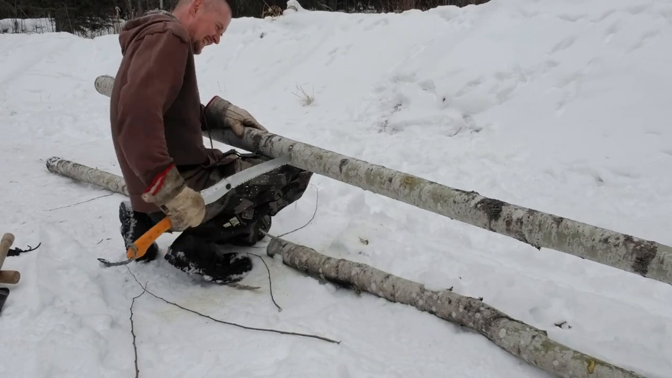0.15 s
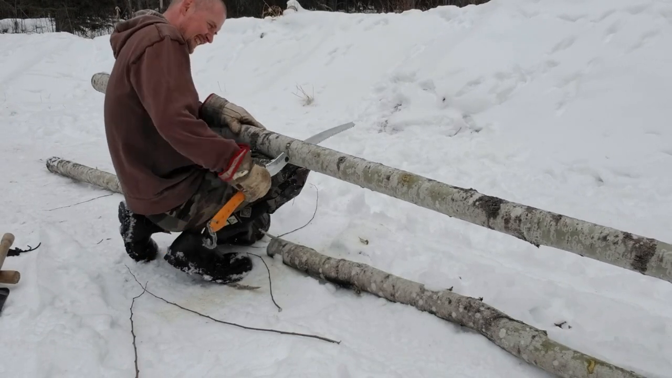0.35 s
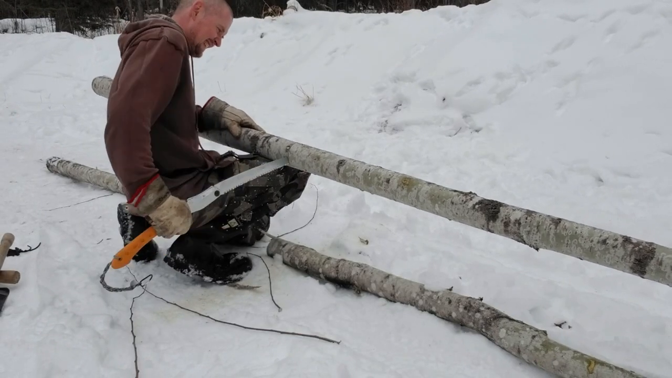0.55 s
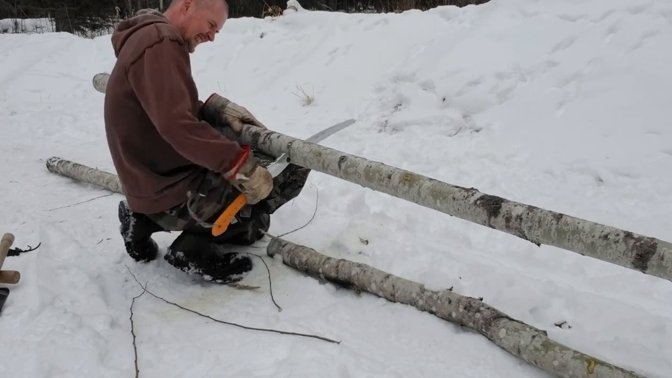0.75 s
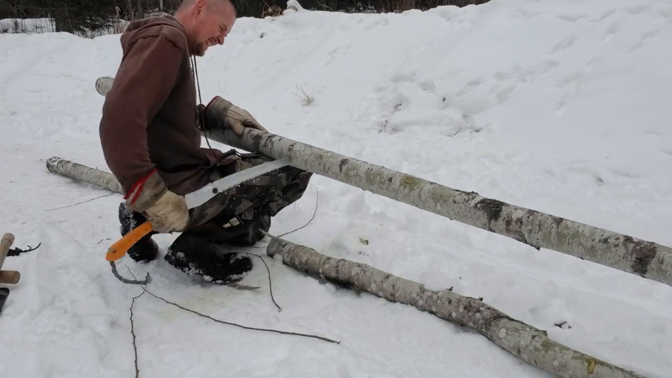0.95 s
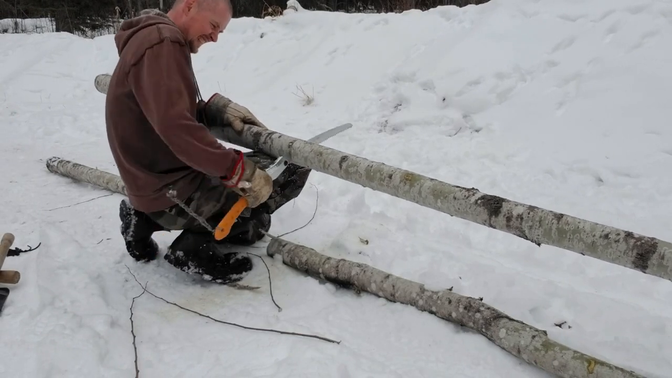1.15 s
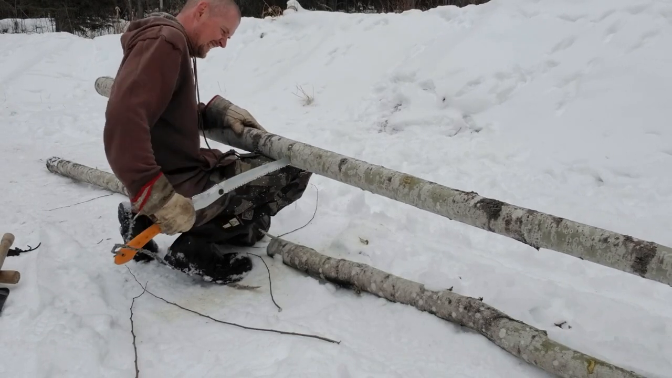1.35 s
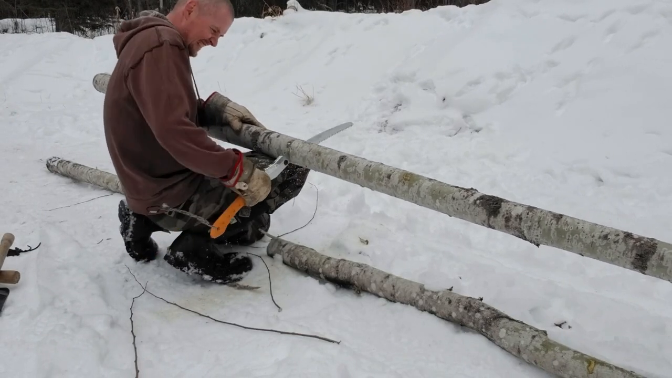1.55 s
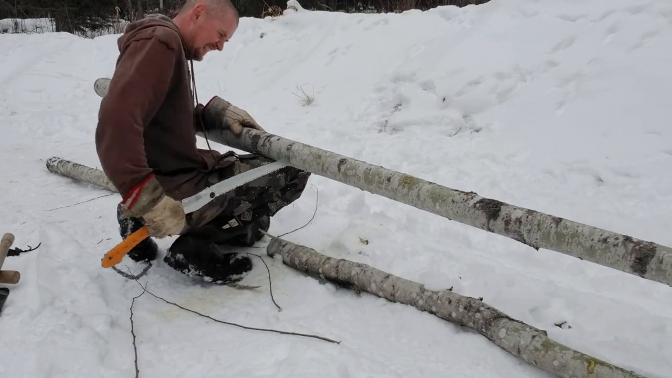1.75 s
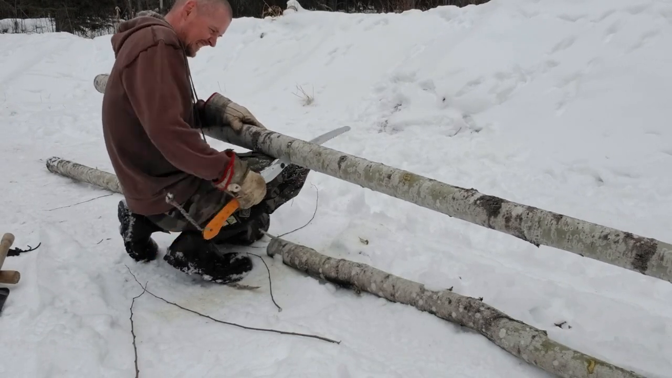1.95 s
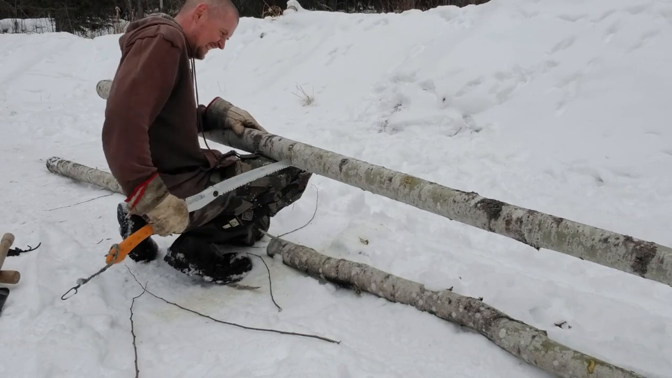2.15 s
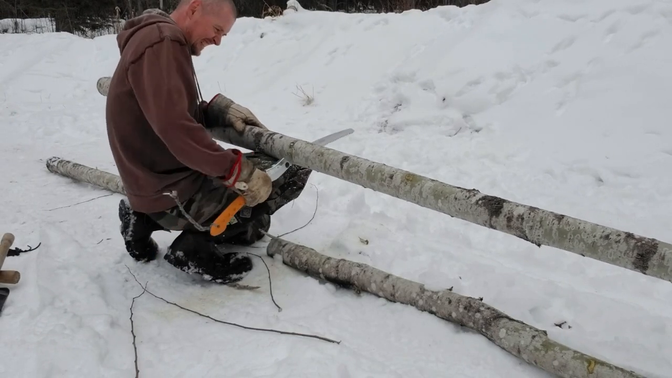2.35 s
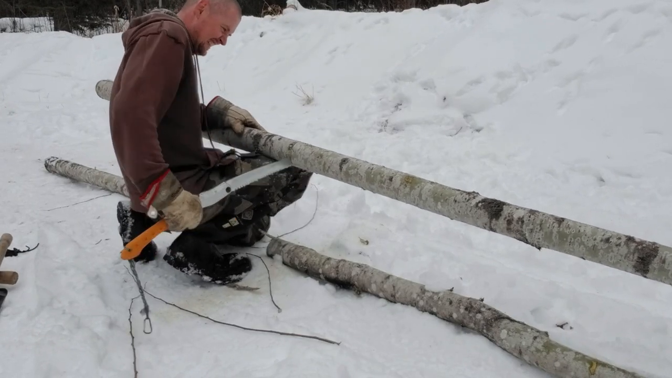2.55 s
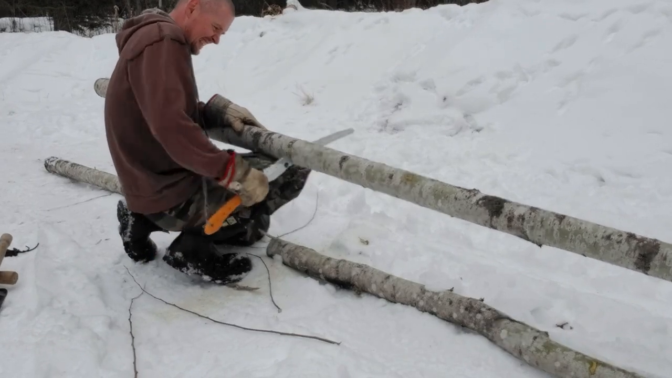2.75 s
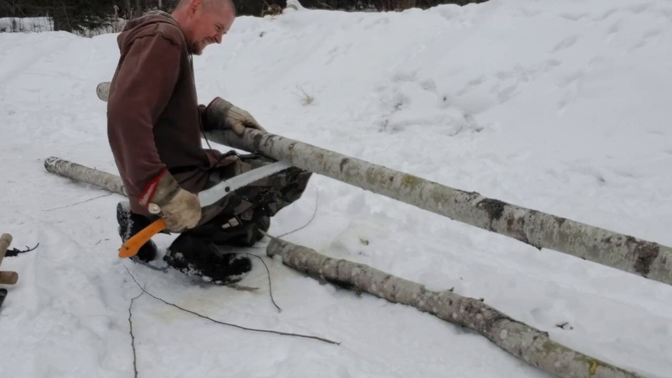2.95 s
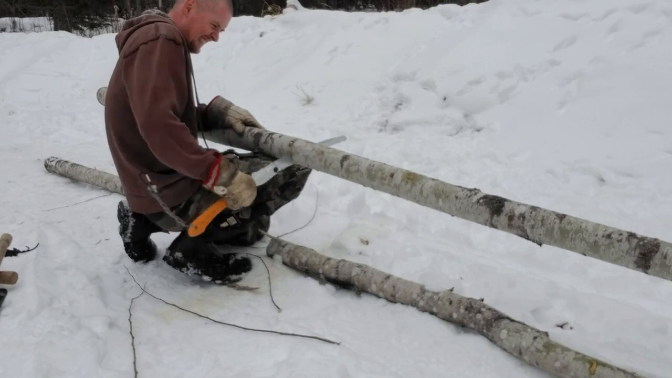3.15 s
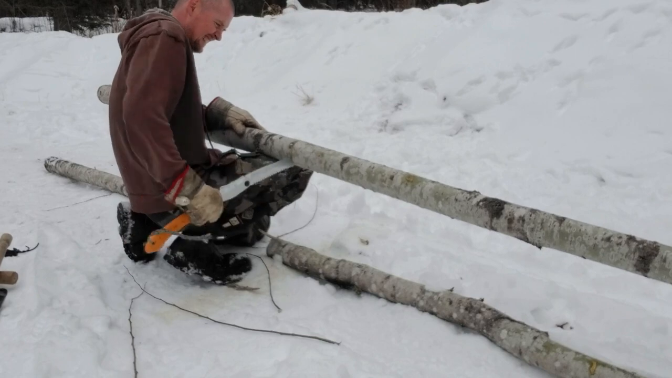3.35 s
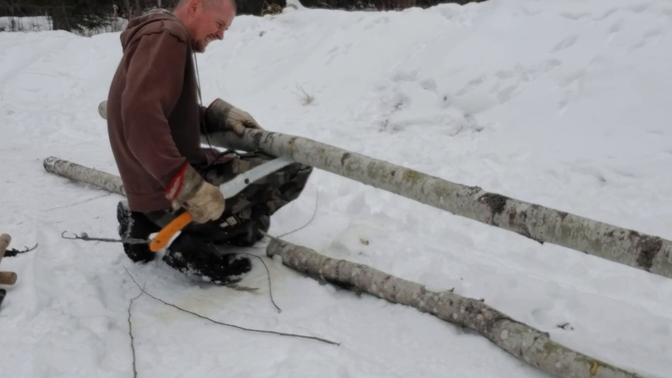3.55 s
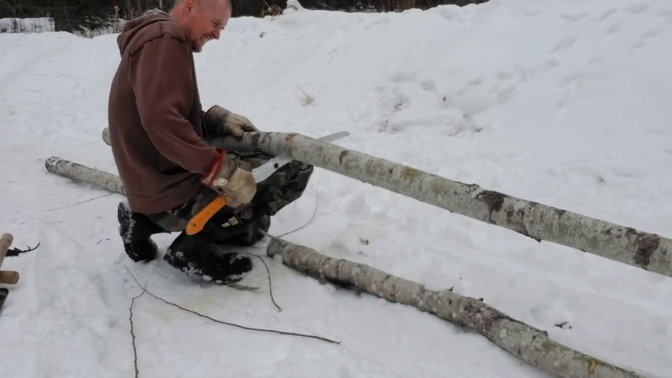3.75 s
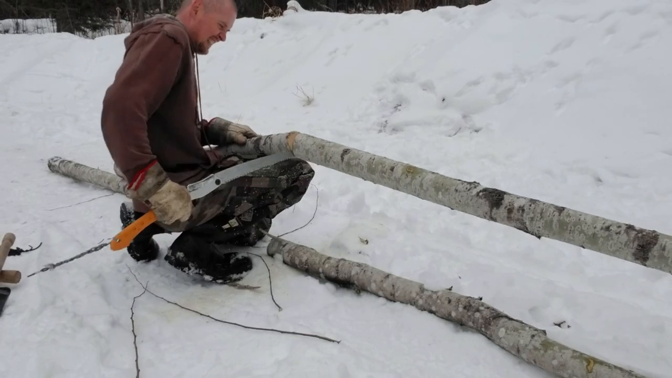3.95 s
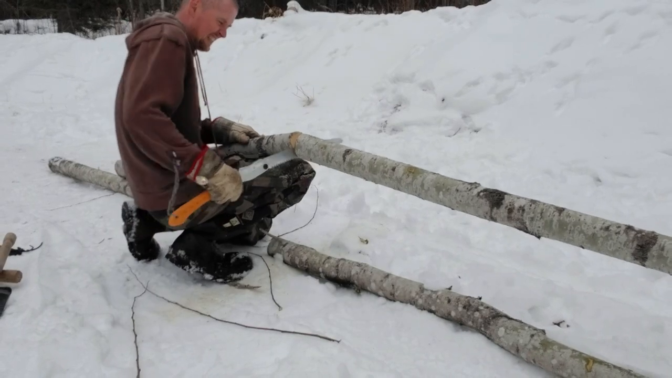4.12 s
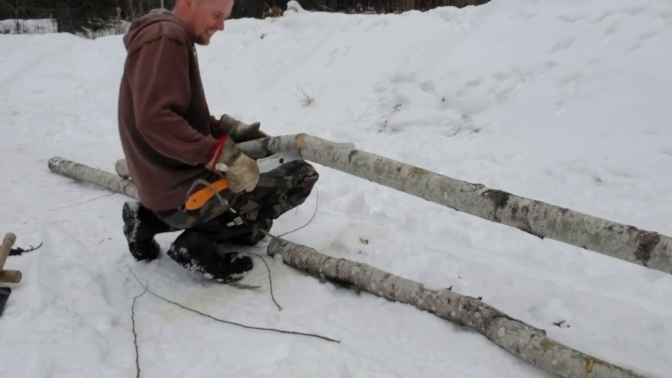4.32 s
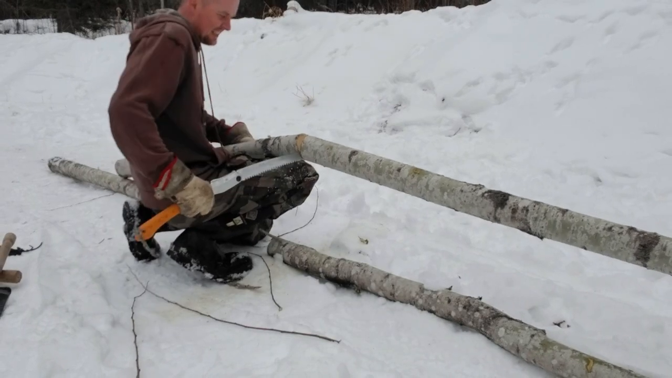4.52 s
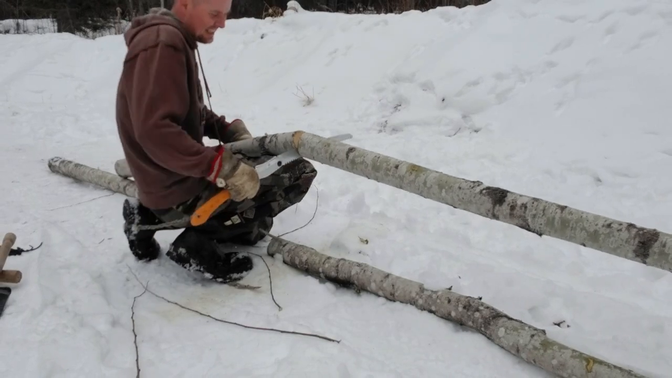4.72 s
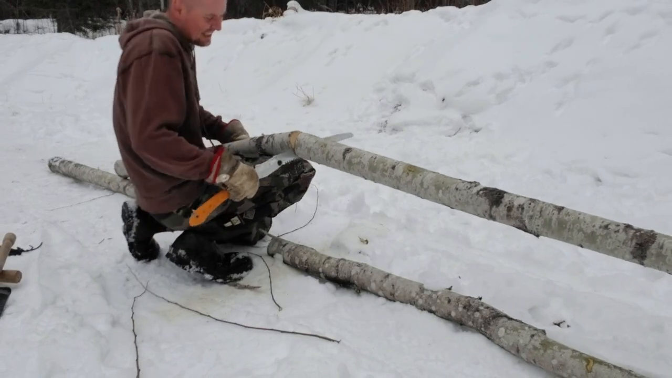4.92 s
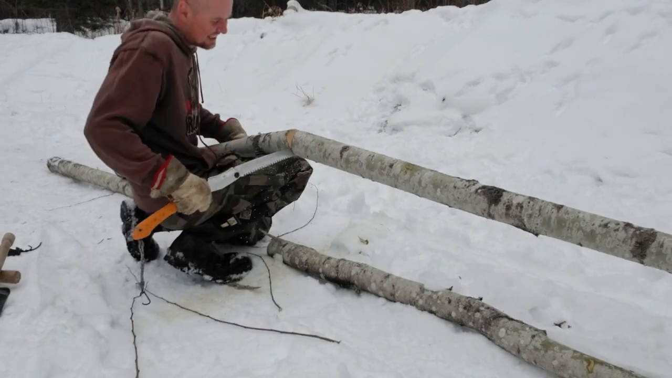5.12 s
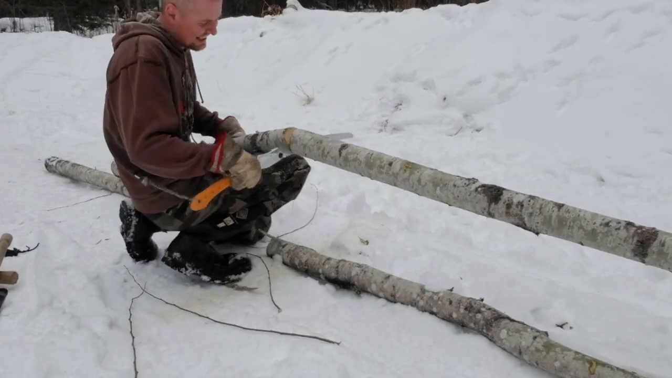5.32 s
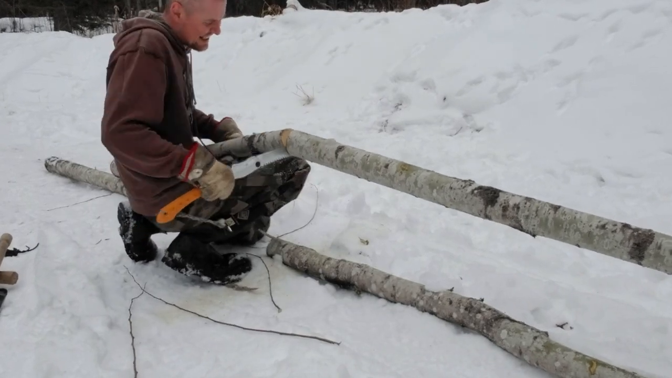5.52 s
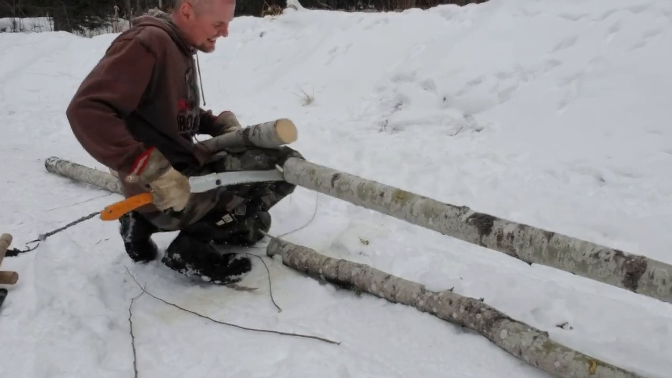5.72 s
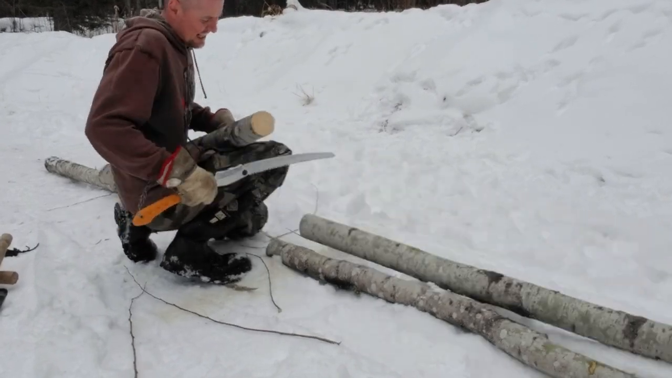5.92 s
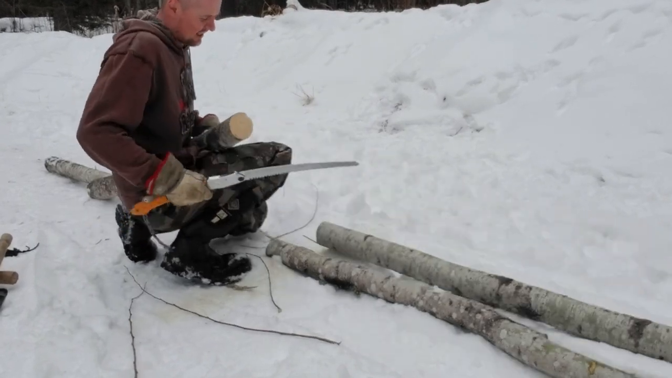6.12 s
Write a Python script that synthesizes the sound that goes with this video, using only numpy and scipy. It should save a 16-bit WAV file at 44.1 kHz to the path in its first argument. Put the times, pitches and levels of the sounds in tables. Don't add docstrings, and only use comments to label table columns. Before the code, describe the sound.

Steady toothy rasping of a hand saw in damp wood, about five strokes a second counting both directions, heard close in stereo on an open snowy slope with no echo. The blade chatters and the handle taps the wood. Later strokes are slower and weaker as the cut opens; a bright crack and solid wooden thump end it, leaving near silence.

```python
import sys
import numpy as np
from scipy import signal
from scipy.fft import rfft, irfft
from scipy.io import wavfile
from scipy.ndimage import uniform_filter1d

SR = 44100
rng = np.random.default_rng(int(sys.argv[2]) if len(sys.argv) > 2 else 0)


def unload_wav(signal):
    wavfile.write(
        sys.argv[1],
        SR,
        np.round(np.clip(np.atleast_2d(signal).T, -1, 1) * 32767).astype(np.int16),
    )


def elevation(decibels):
    levels = np.asarray(decibels, float)
    return 10 ** (levels / 20)


N = 272538

# (frequency [Hz], density [dB per Hz])
AIR_COLOUR = [(15, -27), (25, 3), (361, -12), (1180, -10), (1460, -15), (2250, -8), (3200, -22),
              (15700, -25)]
AIR_DB = -65
# (fastest moment [s], speed-up [s], slow-down [s], rasp [dB], ring at the kerf [dB])
PULLS = [(.088, .15, 0.11, -30, -43.5), (.484, .13, 0.12, -28.5, -44.5), (.912, .17, 0.1, -29, -43.5),
         (1.315, .13, 0.12, -30, -46), (1.707, .13, 0.12, -27.5, -42), (2.112, 0.14, 0.12, -28.5, -43),
         (2.525, .15, 0.13, -29.5, -43.5), (2.942, .17, 0.11, -29.5, -43), (3.385, .18, 0.11, -29, -42.5),
         (3.826, 0.19, 0.17, -30.5, -40.5), (4.43, 0.2, 0.14, -36, -39.5), (5.0, 0.28, 0.16, -35, -44),
         (5.57, .3, 0.28, -34.5, -41)]
# (fastest moment [s], speed-up [s], slow-down [s], rasp [dB], ring at the kerf [dB])
PUSHES = [(0.289, 0.13, 0.12, -33.5, -42), (0.707, 0.13, 0.14, -33, -42.5),
          (1.11, 0.13, 0.12, -33.0, -43.5), (1.511, 0.13, 0.13, -33.5, -42.5),
          (1.919, 0.14, 0.12, -34.5, -43), (2.33, 0.14, 0.11, -33.5, -44), (2.716, 0.11, 0.14, -34, -46.0),
          (3.136, 0.13, 0.16, -35, -43.5), (3.606, 0.15, 0.16, -34.3, -43.5),
          (4.103, 0.17, 0.18, -42, -43.5), (4.711, 0.2, 0.17, -41, -46), (5.276, 0.21, 0.22, -42, -44.5),
          (5.786, 0.14, 0.17, -40, -47)]
# powers of blade speed, and drift over the stroke in dB per s
RASP_POWER, KERF_POWER, POLE_POWER = (2.97, 3.34), (1.9, 2.71), (1.72, 1.65)
RASP_LEAN_DB_PER_S, KERF_LEAN_DB_PER_S, POLE_LEAN_DB_PER_S = (24, 9), (5, 31.5), (34, 21)
POLE_DB, POLE_FOLLOWS, REFERENCE_RASP_DB = (-42.5, -45), 0.32, -31.5
DRAG_DB = (-84, -82.5, -77.5)
# (time [s], held [s], level [dB], time to set in [s])
JAMS = [(0.352, 0.022, -13, .004), (.758, 0.03, -19, .004), (2.794, 0.019, -12, 0.0055),
        (3.69, 0.019, -9, 0.024), (3.95, 0.022, 2, .004), (4.209, 0.11, -13.5, .05),
        (4.417, .03, 4, 0.0036), (4.825, .052, -15.5, 0.0064), (5.369, .078, -14, 0.031),
        (5.695, 0.053, -6.5, 0.0053), (5.842, .4, -67, 0.0041)]
# (time [s], gape [0 tight to 1 open])
SAG = [(0, 0.1), (3.9, 0.14), (4.06, 0.41), (4.2, 1), (4.34, 0.95), (4.45, 0.51), (4.7, 0.47), (5., 0.31),
       (5.3, 0.5), (5.47, 0.22), (5.8, 0.14)]
PULL_GAPE = 0.14
POLE_SAG_DB = -8.5
# (first bite [s], end [s], rate at start [bites per s], rate at end [bites per s], depth [dB])
CHATTER = [(0.017, 0.1, 53, 83, 3.4), (0.427, 0.48, 69, 65, 5.0), (0.695, 0.755, 53, 75, 2.6),
           (0.825, 0.9, 59, 83, 2.3), (1.266, 1.36, 59, 91, 4.6), (2.851, 2.95, 47, 75, 4.5),
           (3.128, 3.21, 93, 117, 2.7), (3.286, 3.39, 43, 73, 6.2), (3.731, 3.82, 55, 43, 5.3),
           (3.869, 3.94, 49, 35, 2.6), (4.05, 4.13, 65, 51, 3.6), (4.399, 4.53, 35, 63, 3.2),
           (4.618, 4.8, 81, 67, 2.8), (4.901, 5.09, 45, 69, 4.8), (5.475, 5.55, 35, 67, 5.2)]
# (frequency [Hz], density [dB per Hz])
RASP_COLOUR = [(1470, -24), (2500, -13), (2870, -12.5), (4250, -13.5), (6440, -9), (7060, -10.5),
               (7800, -7), (8890, -10), (12700, -1), (15700, -2.5)]
# (frequency [Hz], width [Hz], level tight [dB], level open [dB])
KERF_MODES = [(1067, 76, -1, -7), (1320, 93, 2, -7.5), (1635, 310, 1, 1), (2139, 370, -2, 11.5),
              (2736, 520, -3, 11.5), (4800, 3000, -6, 5)]
# (frequency [Hz], width [Hz], level tight [dB], level open [dB])
POLE_MODES = [(60, 45, -3.5, 1.5), (192, 79, 3, -10.5), (403, 34, 0, -4.5), (469, 120, 1, -4),
              (700, 92, 4.5, 9.5), (863, 140, 1, 11)]
# (frequency [Hz], level [dB], t60 [s])
STRUCK_MODES = [(150, 7.5, 0.13), (229.5, 8.5, 0.088), (296, -1.5, 0.16), (371.6, 9, 0.095),
                (478, 6, 0.081), (670, 11.5, 0.059), (776, 17, 0.022), (995, 8.5, 0.078), (1335, -17, .018),
                (1610, -18, .02), (2115, -20, .06)]
# (time [s], peak [dB], centre of colour [Hz], width [octaves], ring time [factor])
KNOCKS = [(0.3506, -24.5, 412, 1.03, 0.84), (0.7596, -18.5, 332, 1.5, 0.89), (0.7937, -35.5, 200, 1.9, .65),
          (1.1836, -39, 525, 1.5, 1), (1.992, -51, 310, 1.2, 0.63), (2.397, -41.5, 310, 2.4, 0.85),
          (2.7946, -22.5, 252, 1.9, 1.13), (3.9512, -27, 150, 1, 1.36), (3.987, -40, 340, 0.56, .75),
          (4.828, -39, 270, 1, 1.1), (5.6946, -22.5, 700, 0.13, 1.3), (5.7072, -27, 700, 0.4, 0.63),
          (6.0287, -47, 410, 2.4, 0.41)]
# (time [s], level [dB], length [s], centre [Hz])
SNAPS = [ (.3525, -35, .003, 1400), (.7605, -33, .0046, 1200), (.7955, -37, .003, 9000),
         (1.2545, -39, .004, 12000), (2.2825, -35, .004, 13000), (2.4385, -46, .003, 9000),
         (2.7955, -37, .0025, 1500), (3.0805, -42, .004, 10700), (3.2705, -43, .005, 9000),
         (3.2865, -38, .012, 11000), (3.6995, -42, .003, 4000), (3.7218, -38, .003, 6000),
         (3.7905, -34, .005, 11100), (3.8732, -27, .001, 13000), (3.9622, -34, .004, 2300),
         (3.9624, -34, .002, 10000), (4.0475, -42, .006, 3000), (4.0655, -32, .005, 2200),
         (4.3385, -42, .005, 9000), (4.5725, -51, .008, 12000), (4.8285, -45, .0034, 1200),
         (4.9995, -35, .004, 13000), (5.4695, -38, .0056, 6600),
         (5.6112, -28, .0012, 13000), (5.6737, -26, .002, 12000), (5.6807, -38, .0025, 7000),
         (5.6942, -33, .0023, 5000), (5.8432, -29, .0017, 13000), (5.8457, -27, .0014, 14000),
         (5.8512, -36, .012, 7300), (5.8532, -28, .009, 1220), (5.876, -28, .06, 220),
         (5.8809, -13, .0006, 14500), (5.8882, -38, .0008, 13000), (5.8999, -16, .0007, 13000),
         (5.9002, -35, .005, 2200), (5.93, -39, .08, 150), (6.032, -46, .03, 500),
         (6.1732, -46, .002, 14000)]
SNAP_SPREAD, WIDEST_HZ = 1.16, 9000
# (frequency [Hz], level [dB], t60 [s])
DROP_MODES = [(88.8, -13, 0.86), (143.7, -2.5, 0.22), (200, -8, 0.28), (282.7, 7.5, 0.079),
              (337, 2.5, 0.097), (410, -2, 0.082), (540, 5, 0.05), (668, 2.5, 0.053), (883, -11.5, 0.11),
              (1010, -5.5, 0.062), (1184, -5, 0.096), (1646, -4.5, 0.077)]
# (time [s], peak [dB], centre of colour [Hz], width [octaves], ring time [factor])
DROP_BLOWS = [
    (5.8453, -10, 380, 1.5, 1.4),
    (5.8477, -9, 900, 4.9, 0.57),
    (5.853, -9, 337, 0.87, 1),
    (5.8609, -26, 350, 2.5, 0.67),
    (5.9008, -26, 800, 1.3, 0.11),
]
# (time [s], level [dB], played at -44 dB at most)
SETTLE = [
    (5.84, -30),
    (5.85, -19),
    (5.868, -38),
    (5.904, -31),
    (5.91, -41),
    (6.118, -47),
    (6.134, -56.5),
    (6.18, -63),
]
# (frequency [Hz], density [dB per Hz])
RUSTLE_COLOUR = [(180, -40), (300, -17), (372, -13), (493, -17), (675, -11), (784, -26), (940, -12),
                 (3000, -19), (10700, -21.5), (15700, -16.5)]
# (frequency [Hz], left-right likeness [0 to 1], left minus right [dB])
PORTS = [(30, 0.5, 26), (90.5, 0.98, 0), (350, 0.84, 0.8), (700, 0.73, 2), (1510, 0.77, 2),
         (2940, 0.32, 1.2), (6030, 0.3, 3.5), (11100, 0.79, 1), (15200, 0.26, 7.5)]


def evened(x):
    return x / np.sqrt(np.mean(x ** 2) + 1e-20)


def shaped(x, gain):
    return irfft(rfft(x, axis=-1) * gain, N, axis=-1)


def read(points, column=1):
    table = np.transpose(points)
    bins_hz = np.fft.rfftfreq(N, 1 / SR)
    return np.interp(np.log(bins_hz + 1), np.log(table[0] + 1), table[column])


def resonate(x, hz, width):
    r = np.exp(-np.pi * width / SR)
    poles = [1, -2 * r * np.cos(2 * np.pi * hz / SR), r * r]
    return np.sqrt(1 - r) * signal.lfilter([1, 0, -r], poles, x)


def add(mix, s, sound):
    part = mix[..., round(s * SR):][..., :sound.shape[-1]]
    part += sound[..., :part.shape[-1]]


def grit(spread_db, flicker_db, flicker_s):
    size = elevation(spread_db * np.minimum(rng.exponential(1, N), 6))
    flicker = evened(uniform_filter1d(rng.standard_normal(N), max(int(flicker_s * SR), 2)))
    return evened(rng.standard_normal((2, N)) * size * elevation(flicker_db * flicker))


def still_air():
    return elevation(AIR_DB) * evened(shaped(rng.standard_normal((2, N)), elevation(read(AIR_COLOUR))))


def stroke(crest, rise, fall):
    t = np.arange(N) / SR - crest
    phase = np.clip(np.where(t < 0, t / rise, t / fall), -1, 1)
    return t, np.cos(np.pi / 2 * phase).clip(0)


def effort():
    t = np.arange(N) / SR
    power = np.zeros((3, N)) + elevation(2 * np.array(DRAG_DB))[:, None]
    pulling = np.zeros(N)
    for way, rows in enumerate((PULLS, PUSHES)):
        powers = RASP_POWER[way], KERF_POWER[way], POLE_POWER[way]
        leans = RASP_LEAN_DB_PER_S[way], KERF_LEAN_DB_PER_S[way], POLE_LEAN_DB_PER_S[way]
        for crest, rise, fall, rasp_db, kerf_db in rows:
            u, speed = stroke(crest, rise, fall)
            on = speed > 1e-4
            u, speed = u[on], speed[on]
            pole_db = POLE_DB[way] + POLE_FOLLOWS * (rasp_db - REFERENCE_RASP_DB)
            for k, db in enumerate((rasp_db, kerf_db, pole_db)):
                power[k, on] += (elevation(db + leans[k] * u) * speed ** powers[k]) ** 2
            if rows is PULLS:
                pulling[on] += np.sqrt(speed)
    held_db = sum(db * np.clip((t - s) / sink, 0, 1) * (t < s + held) for s, held, db, sink in JAMS)
    gape = np.interp(t, *np.transpose(SAG)) + PULL_GAPE * pulling
    power[2] *= elevation(2 * POLE_SAG_DB * gape)
    return np.sqrt(power) * elevation(uniform_filter1d(held_db, size=200)), gape


def chatter():
    swing_db = np.zeros(N)
    for start, end, rate0, rate1, depth_db in CHATTER:
        t = np.arange(-.008, end - start, 1 / SR)
        turn = 2 * np.pi * (rate0 * t + (rate1 - rate0) * t ** 2 / (2 * (end - start)))
        bite = np.cos(turn) - .3 * np.sin(2 * turn)
        bite *= np.linspace(1.25, .65, len(t)) * signal.windows.tukey(len(t), .4)
        add(swing_db, start + t[0], depth_db * bite)
    return swing_db


def ring(drive, modes, opened, band_hz):
    drive = drive * rng.choice([-1., 1.], N)
    gains = [elevation(tight_db + (open_db - tight_db) * opened) for _, _, tight_db, open_db in modes]
    total = np.sqrt(sum(g ** 2 for g in gains))
    out = 0
    for k, (mode, gain) in enumerate(zip(modes, gains)):
        out = out + (-1) ** k * resonate(drive * gain / total, mode[0], mode[1])
    return signal.sosfilt(signal.butter(2, band_hz, "bandpass", fs=SR, output="sos"), out)


def grain(x, patchy_db):
    z = signal.stft(x, nperseg=256)[2]
    patches = uniform_filter1d(rng.standard_normal(z.shape[1:]), size=3, axis=0)
    patches = evened(uniform_filter1d(patches, size=12, axis=1))
    gain = elevation(patchy_db * patches - 0.15 * patchy_db ** 2)
    return signal.istft(z * gain, nperseg=256)[1][:, :N]


def saw():
    (tear, cut, hum), opened = effort()
    bounce_db = chatter()
    teeth = grit(spread_db=1.5, flicker_db=0.73, flicker_s=0.0029)
    hiss = elevation(read(RASP_COLOUR))
    rasp = shaped(teeth * tear * elevation(bounce_db), hiss / np.sqrt(np.mean(hiss ** 2)))
    kerf = ring(teeth * cut * elevation(0.76 * bounce_db), KERF_MODES, opened, band_hz=(800, 4600))
    pole = ring(teeth * hum * elevation(0.82 * bounce_db), POLE_MODES, opened, band_hz=(60, 950))
    return grain(rasp + elevation(3.0) * kerf + elevation(0.5) * pole, patchy_db=2.5)


def knocks(modes, blows):
    out, t = np.zeros(N), np.arange(SR // 2) / SR
    hz, db, t60 = np.transpose(modes + modes)[:, :, None]
    sign = (-1) ** (np.arange(len(hz))[:, None] % len(modes))
    contact = np.hanning(30)
    chances = rng.standard_normal((len(blows), 2, len(hz), 1))
    for (s, peak_db, centre_hz, octaves, long), (detune, uneven) in zip(blows, chances):
        reach_db = -6 * (np.log2(hz / centre_hz) / octaves) ** 2
        decay = elevation(db + reach_db - 60 * t / (t60 * long))
        swing = sign * elevation(1.5 * uneven) * np.sin(2 * np.pi * hz * (1 + .018 * detune) * t)
        wave = np.convolve((decay * swing).sum(0), contact)
        add(out, s, elevation(peak_db) * wave / abs(wave).max())
    out = signal.sosfilt(signal.butter(2, 90, "highpass", fs=SR, output="sos"), out)
    return np.array([out, signal.hilbert(out).imag])


def snaps():
    out, t = np.zeros((2, N)), np.arange(9000) / SR
    events = SNAPS
    noises = rng.standard_normal((len(events), 2, len(t)))
    for (s, db, length, hz), noise in zip(events, noises):
        u = 3 * t / length
        width = min(SNAP_SPREAD * hz, WIDEST_HZ)
        burst = evened(resonate(resonate(noise, hz, width), hz, width))
        add(out, s - length / 3, elevation(db) * burst * u * np.exp(1 - u))
    return out


def rustle():
    s, db = np.transpose(SETTLE)
    slips = grit(spread_db=2.0, flicker_db=1.5, flicker_s=0.0065)
    level_db = np.interp(np.arange(N) / SR, s, np.minimum(db, -44), left=-110)
    return evened(shaped(slips, elevation(read(RUSTLE_COLOUR)))) * elevation(level_db)


def scene():
    field = still_air() + saw() + knocks(STRUCK_MODES, KNOCKS) + snaps()
    field = field + knocks(DROP_MODES, DROP_BLOWS) + rustle()
    same = np.clip(read(PORTS), 0, 1)
    lean = elevation(read(PORTS, column=2) / 2)
    left = shaped(field[0], lean)
    right = shaped(field[0], same / lean) + shaped(field[1], np.sqrt(1 - same ** 2) / lean)
    return elevation(1.0) * np.array([left, right])


def band_limit(x):
    return signal.sosfilt(signal.butter(12, 16990, fs=SR, output="sos"), x)


def record(dry):
    cut = signal.sosfilt(signal.butter(3, 58, "highpass", fs=SR, output="sos"), dry)
    main, shelf = (signal.firwin(511, hz, window=("kaiser", 7), fs=SR) for hz in (15830, 16550))
    edge = main + elevation(-21) * (shelf - main)
    mix = signal.oaconvolve(cut, edge[None], "same")
    return band_limit(mix)


dry = scene()
out = record(dry)
unload_wav(out)
```